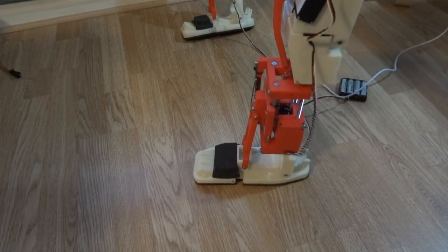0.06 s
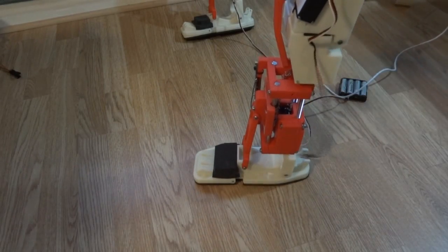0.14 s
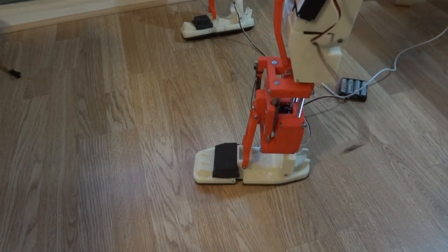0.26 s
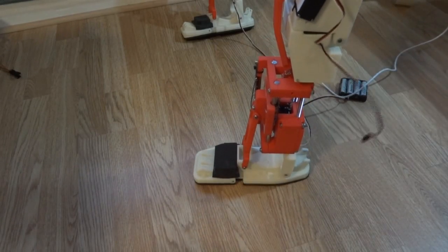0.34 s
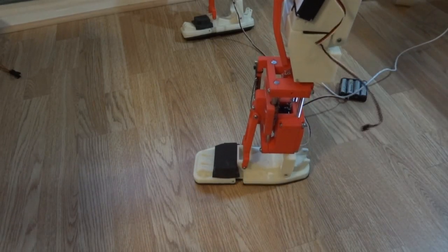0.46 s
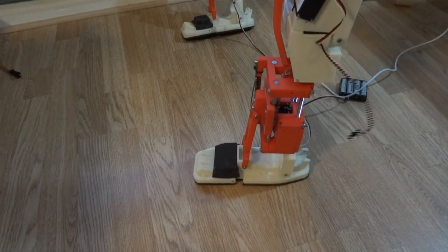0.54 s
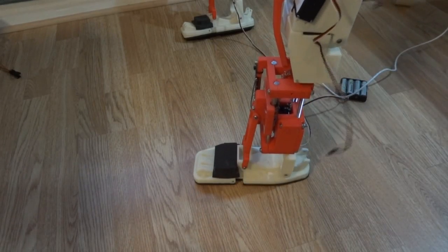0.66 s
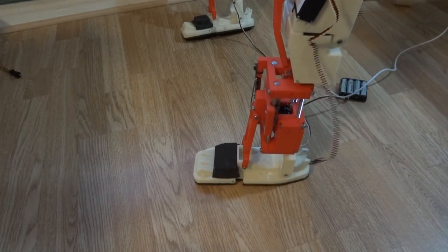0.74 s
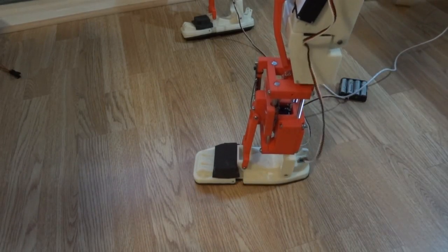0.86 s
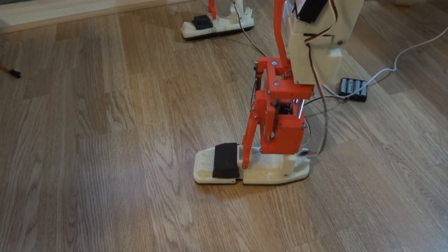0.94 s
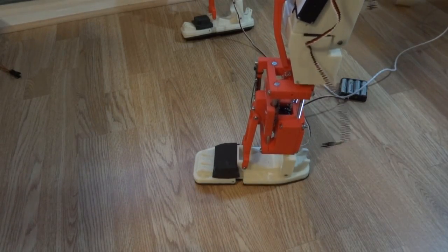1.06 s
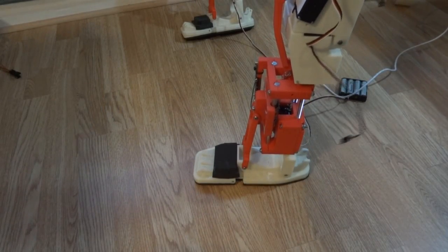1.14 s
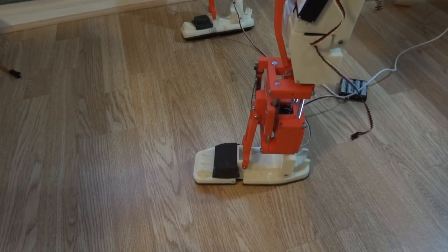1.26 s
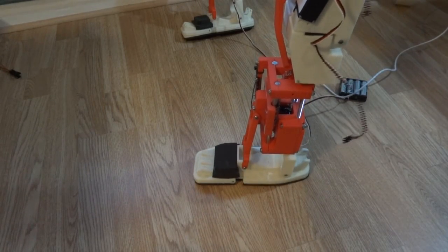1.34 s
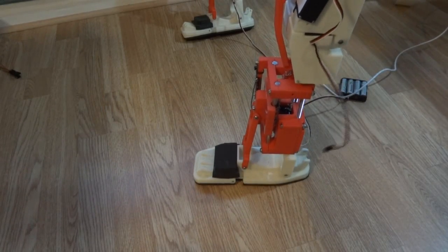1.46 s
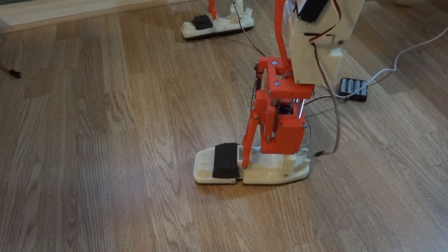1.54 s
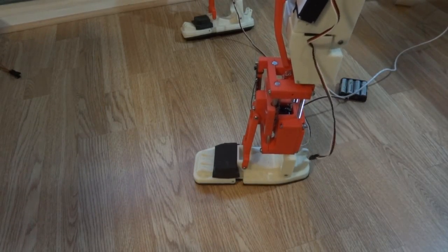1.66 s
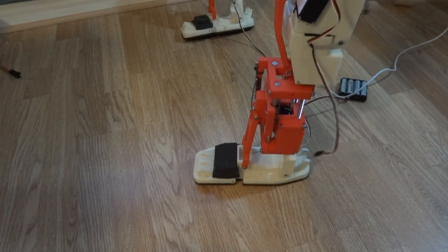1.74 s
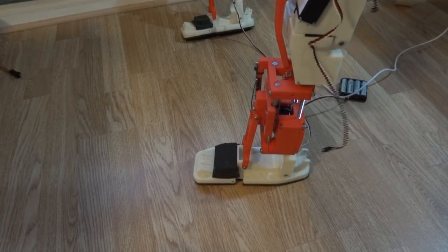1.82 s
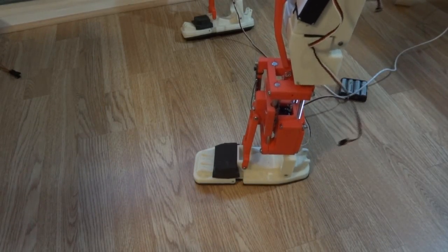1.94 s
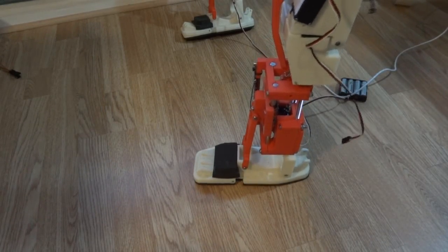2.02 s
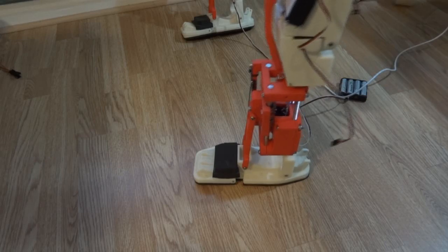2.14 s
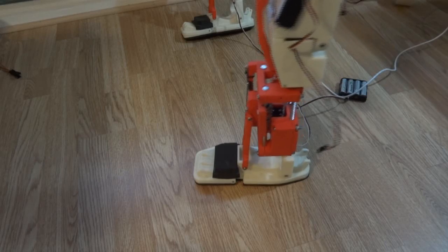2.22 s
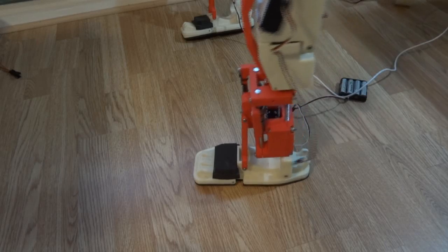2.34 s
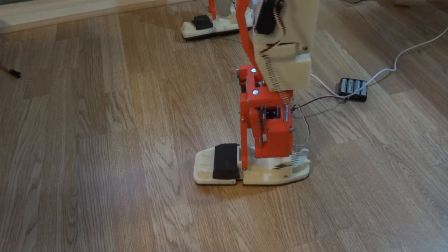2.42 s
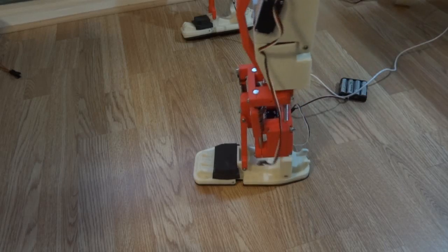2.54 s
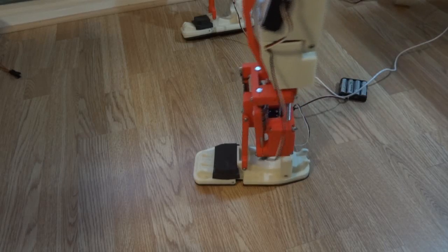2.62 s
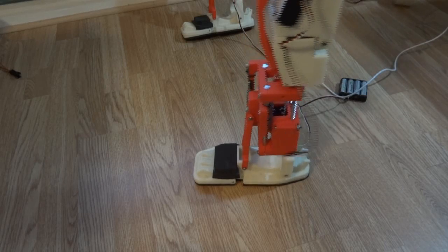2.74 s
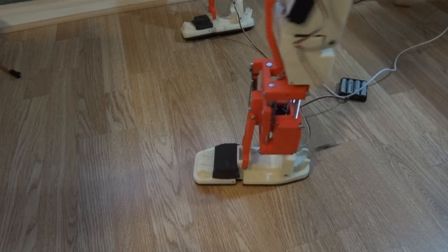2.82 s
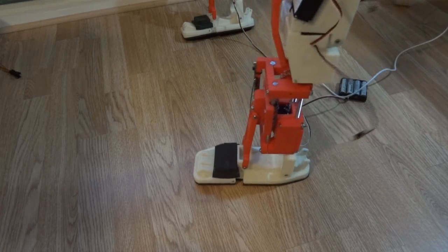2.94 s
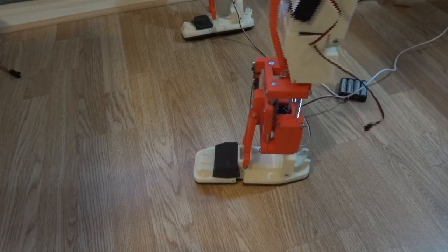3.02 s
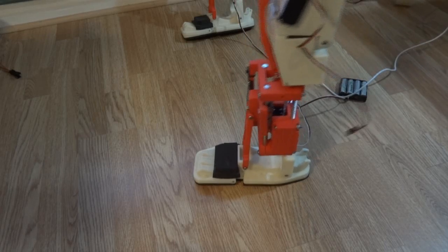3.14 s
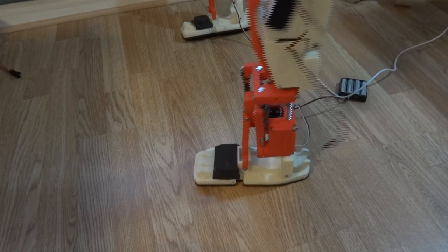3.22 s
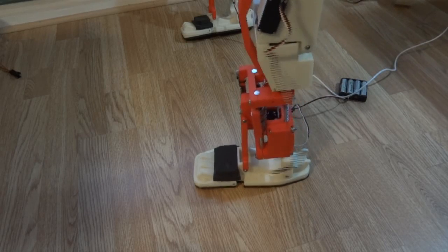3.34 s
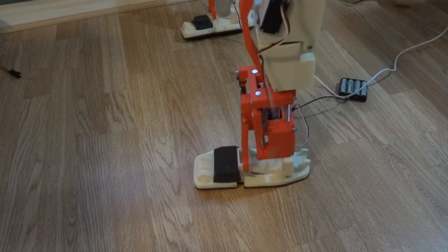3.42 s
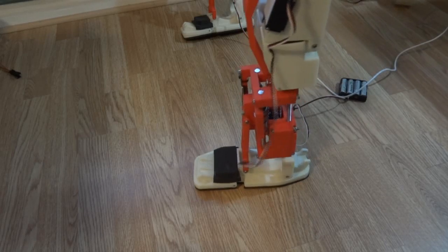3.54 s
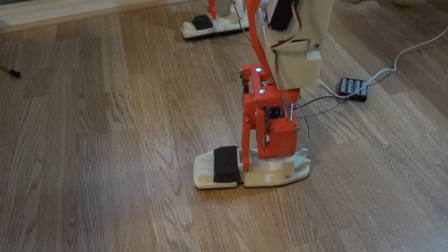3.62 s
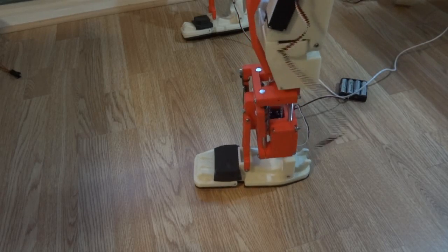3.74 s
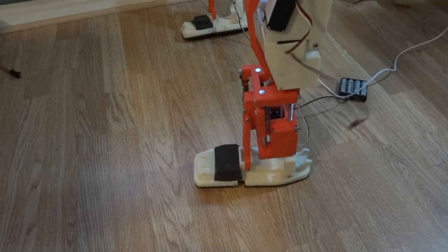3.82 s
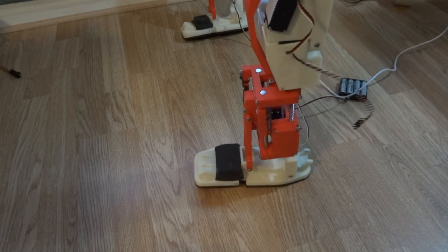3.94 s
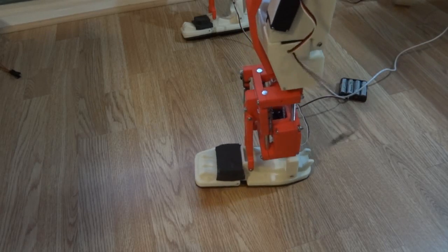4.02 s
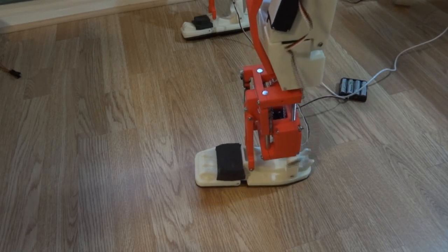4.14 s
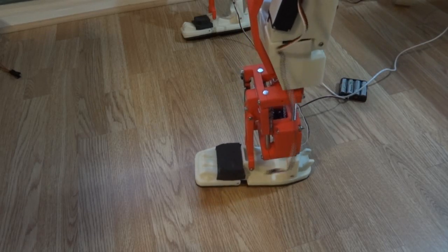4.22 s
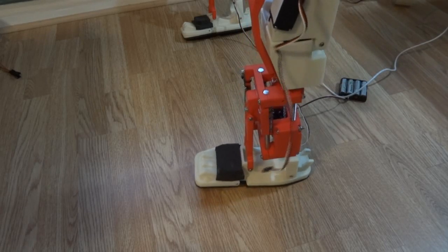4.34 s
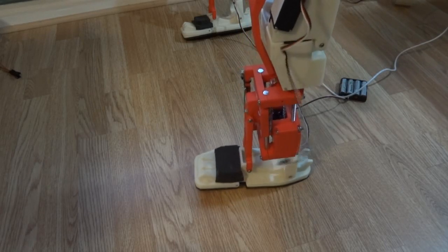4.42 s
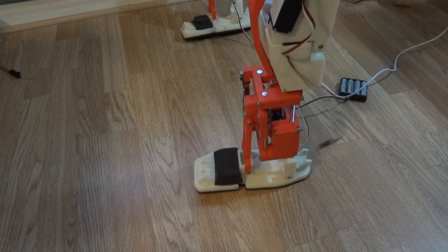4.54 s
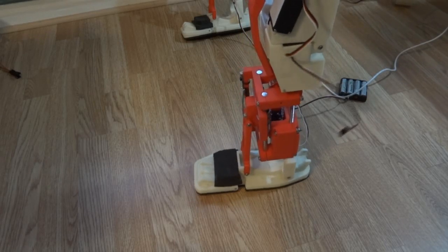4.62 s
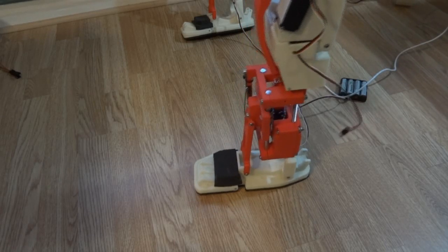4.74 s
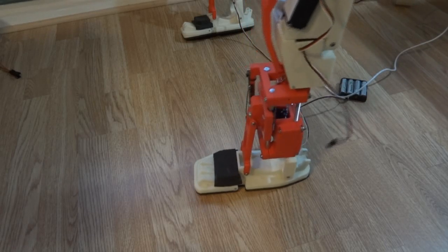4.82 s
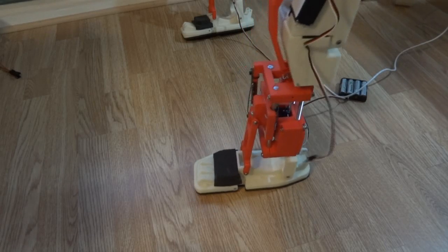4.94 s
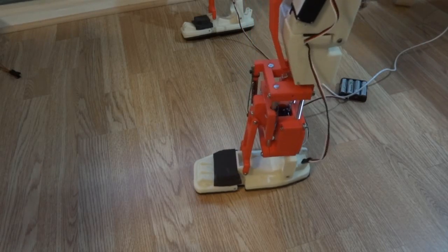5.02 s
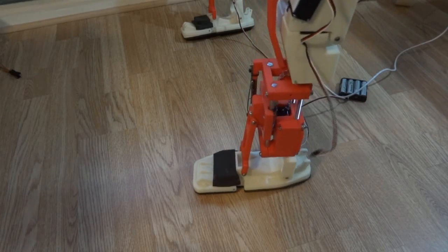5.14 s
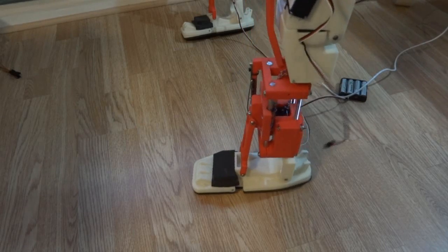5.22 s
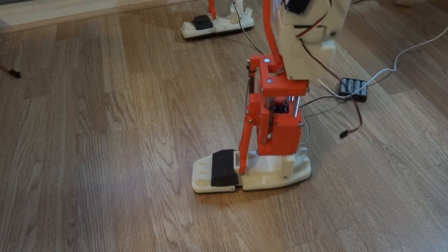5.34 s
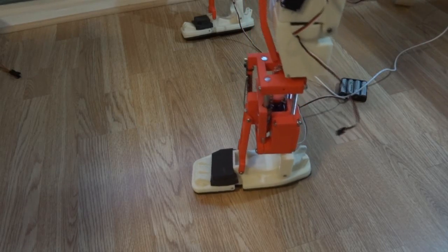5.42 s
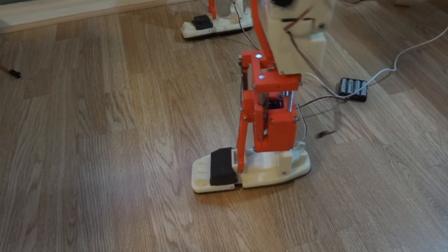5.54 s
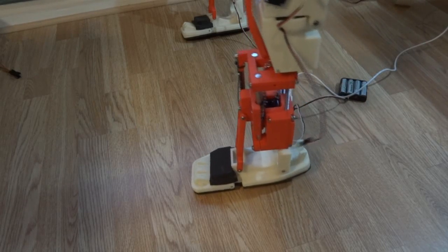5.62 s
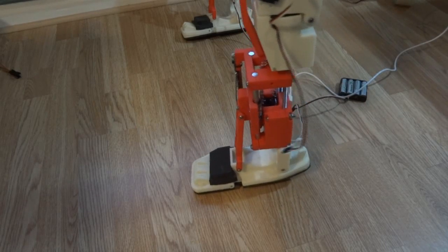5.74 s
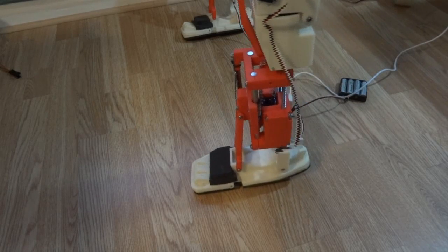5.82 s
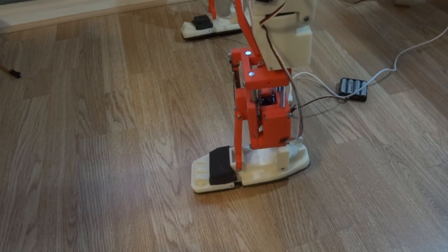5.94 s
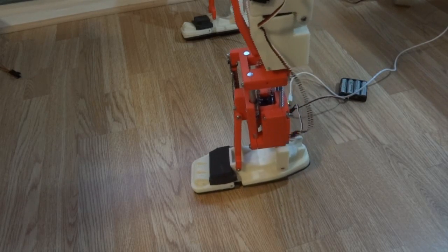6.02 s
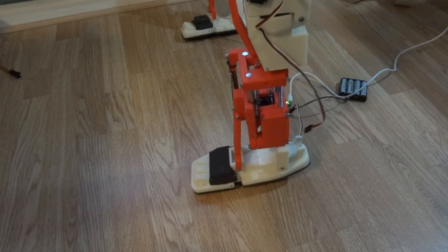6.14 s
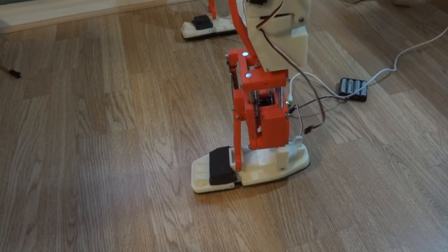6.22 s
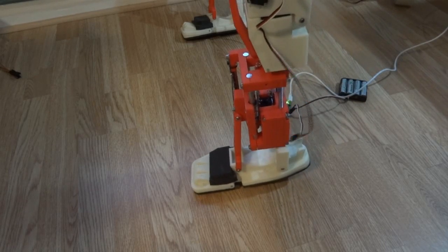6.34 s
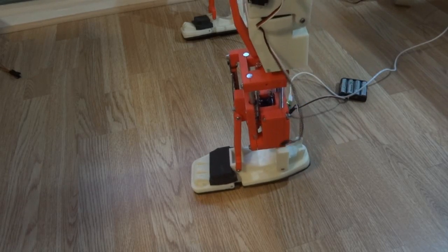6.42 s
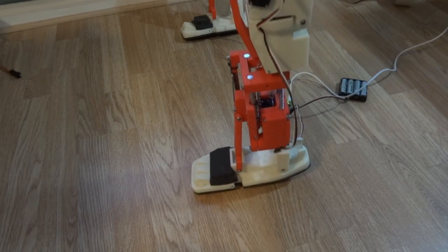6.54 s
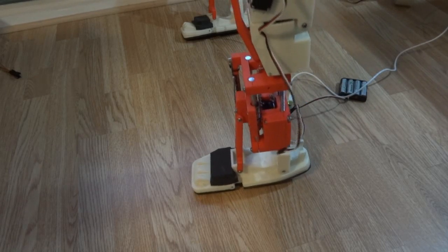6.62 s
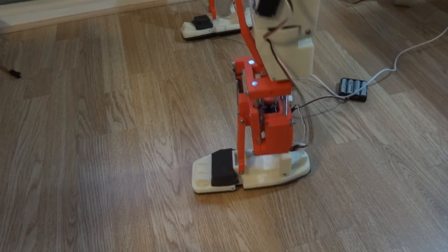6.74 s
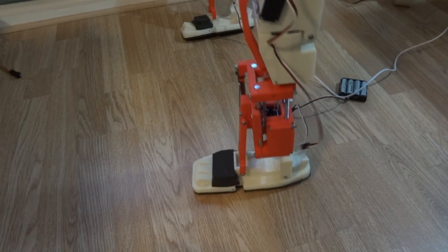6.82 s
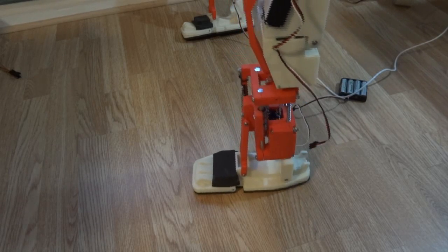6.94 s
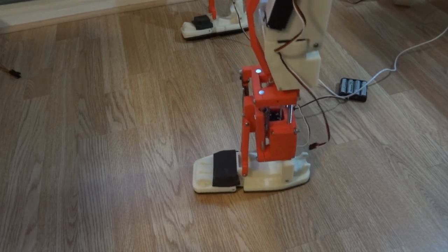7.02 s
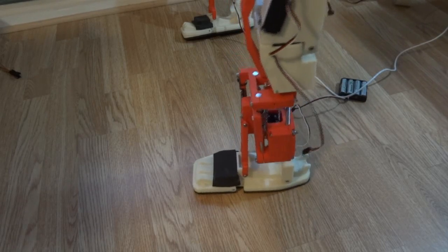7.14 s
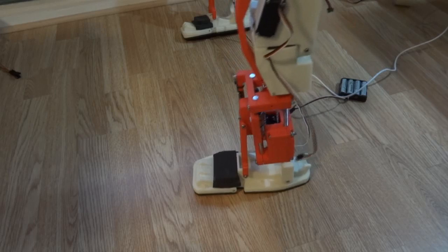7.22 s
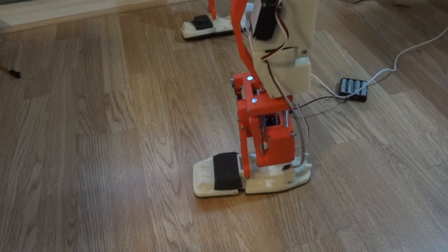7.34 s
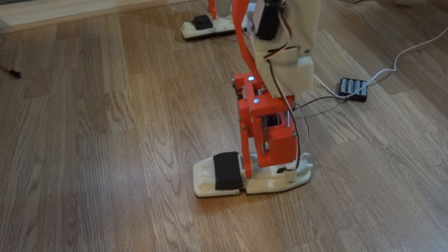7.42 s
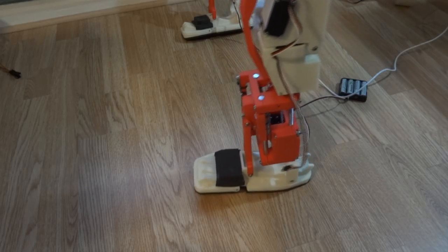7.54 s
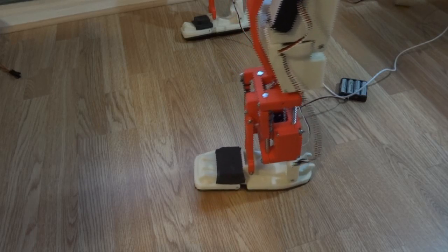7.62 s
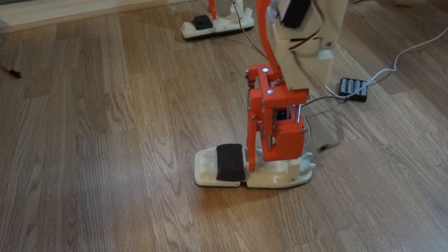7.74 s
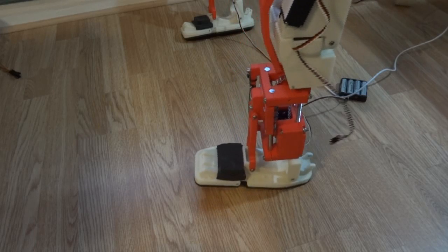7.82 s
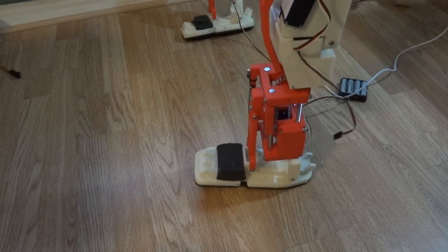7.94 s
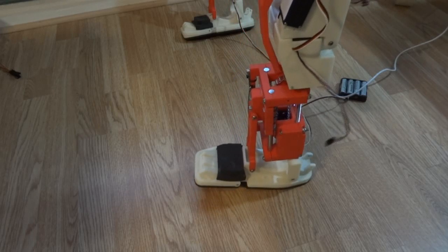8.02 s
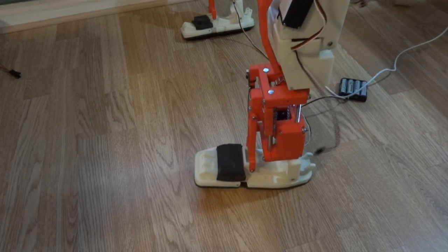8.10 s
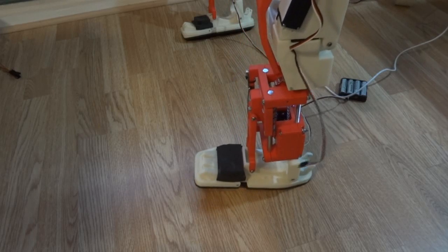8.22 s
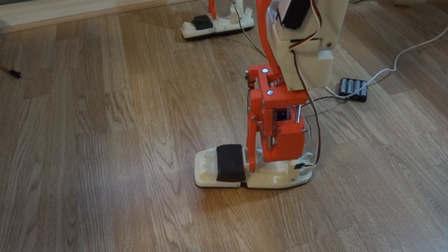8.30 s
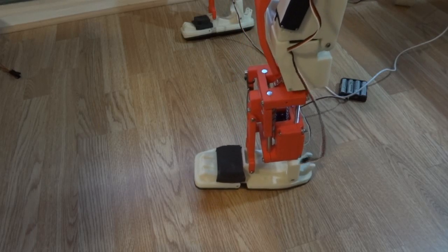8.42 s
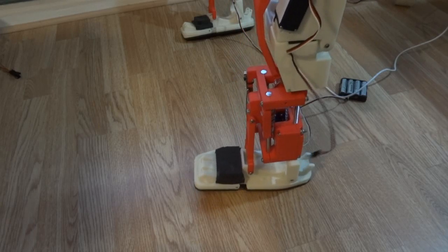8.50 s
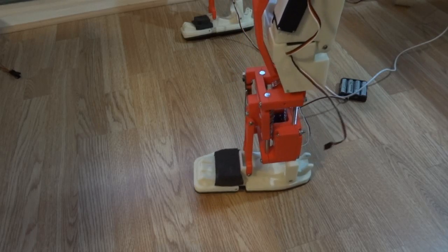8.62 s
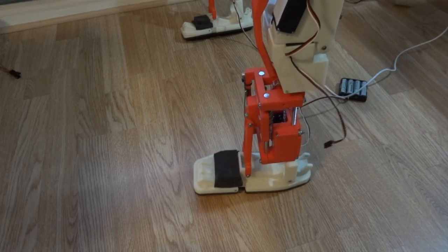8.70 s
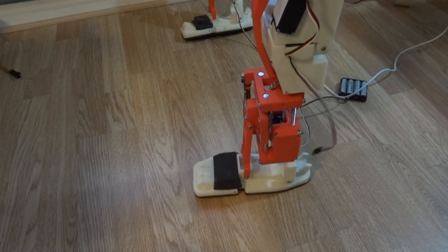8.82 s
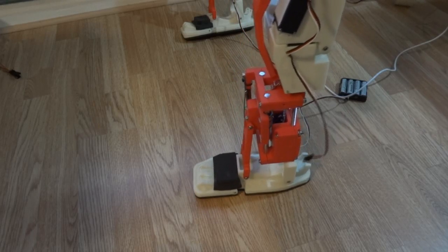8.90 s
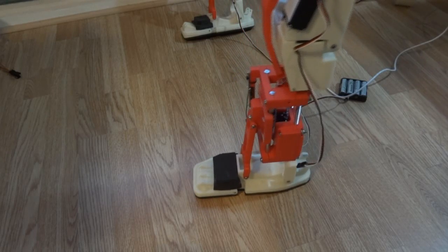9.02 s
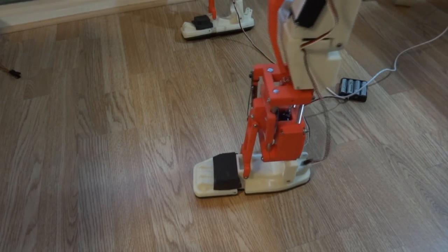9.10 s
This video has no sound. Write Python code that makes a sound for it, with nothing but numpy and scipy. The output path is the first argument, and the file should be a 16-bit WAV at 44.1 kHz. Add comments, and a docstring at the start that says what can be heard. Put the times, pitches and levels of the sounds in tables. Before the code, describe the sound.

Small servo motors buzz faintly as they hold a robot's plastic leg still on a wooden floor, heard close in a small room. A few soft scuffs and dull bumps come in the first second, and a light click at 1.6 seconds. At 2 seconds a gear clacks and the motors begin a much louder, high whine with a bright rasp. Five runs follow back to back, starting near 2, 2.5, 3, 3.4 and 4.3 seconds, each rising and falling in pitch. The last begins with a clack and a quieter whir, grows loud, then winds down by 5.5 seconds. The buzz returns, with a few sharp ticks around 5.8 to 6 seconds. From 6.5 seconds another run starts strained, turns raspier and slows by 7.7. More buzzing follows, then a clack at 8.4 and a final whine, loudest from 8.9 to 9.2 seconds.

```python
"""A low buzz with a few soft scuffs and bumps, then bursts of whining and rasping: small servo motors
bend a walking robot's plastic leg on a wooden floor in a small room.
The gear whine rises and falls with the motor's speed, and pressed teeth add a bright rasp.
Between moves, about 50 control pulses a second kick the motors and make them buzz."""
import sys
import numpy as np
from scipy import signal
from scipy.fft import rfft, irfft
from scipy.io import wavfile
from scipy.ndimage import uniform_filter1d

SR = 44100
rng = np.random.default_rng(int(sys.argv[2]) if len(sys.argv) > 2 else 0)


def int16_out(signal):
    """Quantize to a 16-bit WAV file."""
    q = np.round(np.clip(np.atleast_2d(signal).T, -1, 1) * 32767)
    wavfile.write(sys.argv[1], SR, q.astype(np.int16))


N = 404397
TIME = np.arange(N) / SR

# Levels in the tables are relative: the functions turn each layer up or down.
# Tone colours, or how strong each pitch is in a sound: pitch_hz, level_db
ROOM_COLOUR = [(25, -28), (55, 0.5), (80, -6), (133, -1), (250, -2), (666, -9), (1050, -4.5), (1600, -6.5),
               (2400, -12), (3200, -16), (6220, -21), (13200, -27), (14000, -23), (15500, -30)]
SCUFF_COLOUR = [(41, -39), (70, -18), (154, 2), (322, -4), (647, -12), (740, -4), (1010, -9), (1700, -9.5),
                (2220, -18), (3480, -14.5), (4260, -17), (15000, -29)]
BUMP_COLOUR = [(90, -8), (150, 1), (300, -3), (450, -7.5), (750, -4.5), (1000, -8.5), (1800, -20),
               (4000, -22), (12000, -28.5)]  # hollow and dull
CLACK_COLOUR = [(710, -71), (1200, -25), (1610, -2), (2060, -4), (4270, 6), (8390, -8.5), (9930, -19),
                (15000, -8)]
TICK_COLOUR = [(1470, -31), (2500, -12), (4320, -5.5), (7640, -1), (9150, -17), (10400, -10), (13400, -21),
               (15000, -21)]
UPRIGHT_BUZZ_COLOUR = [(800, -22), (969, -12), (1050, -15), (1140, -5), (1230, -14), (1350, -7), (1430, -9),
                       (1520, -2), (1660, 2), (1760, -2), (1860, -11), (2480, -15), (2840, -24),
                       (3500, -32)]
BENT_BUZZ_COLOUR = [(470, -47), (800, -47), (911, -13), (1020, 1), (1140, -23), (1260, 3), (1470, 0.5),
                    (1560, 7), (1910, -5), (2000, -34), (2270, -10.5), (3020, -24), (3500, -41),
                    (4550, -65), (7700, -120)]
SHAKE_COLOUR = [(21, -28), (35, -10), (59, -1.5), (81, -13.5), (116, 1), (140, 6), (189, -7.5), (231, 0.5),
                (343, -12), (367, -18), (404, -28), (583, -37), (807, -26), (900, -29), (1170, -40),
                (1980, -120)]
BRUSH_COLOUR = [(400, -12), (535, -13), (809, -20), (943, -12), (1190, -14), (1500, -1.5), (2500, -7),
                (3310, -7), (5080, -12.5), (7000, -13), (10600, -17), (13900, -9), (15500, -6)]  # hiss of the motor's sliding contacts
RASP_COLOUR = [(530, -49), (900, -36.5), (1040, -10), (1230, -21.5), (1500, -19), (1670, -20),
               (1980, -13.5), (2360, -9.5), (2960, -0.5), (3340, -0.5), (4890, 3.5), (7780, -1.5),
               (9080, 0.5), (12100, -11), (15500, -17.5)]
OVERTONE_COLOUR = [(3000, 3), (4500, 3.5), (6000, -2), (7600, -3), (9200, -6), (10800, -9), (12500, -16),
                   (15500, -38)]  # the gear whine's upper tones
# How much left and right differ: pitch_hz, side_level_db
STEREO_WIDTH = [(60, -21), (170, -14), (230, -8.5), (330, -5.5), (600, -2), (850, -3), (1100, -13),
                (1600, -17.5), (3000, -15), (5000, -18.5), (8000, -13), (11000, -32.5), (14000, -48)]
# Pitches at which parts ring: pitch_hz, width_hz (ringing() narrows it), level_db
FLOOR_RINGS = [(57.2, 24, -1)]
FRAME_RINGS = [(226.7, 53, 3), (1002, 390, 2.5)]
CASE_RINGS = [(1646, 42, -8.5), (2234, 73, -7), (2531, 205, -1.5), (2960, 110, -5.5)]

# The leg shifts its weight on the floor: start_s, length_s, level_db
WEIGHT_SHIFTS = [(2.22, 0.16, -46.5), (7.08, 0.1504, -61)]
# Soft scuffs: start_s, length_s, rise_s, level_db
SCUFFS = [(0.231, 0.43, 0.25, -44), (0.736, 0.13, 0.013, -50.5)]
# Short knocks: start_s, level_db
BUMPS = [(0.137, -32), (0.545, -36), (0.592, -31), (0.626, -33), (0.741, -29), (0.764, -29)]
CLACKS = [(0.2558, -45), (1.9824, -30), (4.295, -30.5), (4.3144, -43), (8.4208, -36.5), (8.4413, -30.5)]  # loose gears snap into contact
TICKS = [(0.136, -27.5), (1.5883, -20.5), (1.6144, -43)]  # light plastic clicks

# The leg holds still, upright or bent, and buzzes: start_s, end_s, level_db
UPRIGHT_HOLDS = [(0.0, 1.92, -56)]
BENT_HOLDS = [(4.12, 4.3, -54.5), (5.3, 5.91, -54), (5.96, 6.54, -53), (7.6, 8.45, -56)]
# Pulses are even at rest and uneven while the leg sways: time_s, spread_db
PULSE_UNEVENNESS = [(1.45, .6), (1.55, 2), (5.95, 2), (6.1, .7), (6.55, .7), (7.6, 2.5)]
# Harder kicks of a holding servo, each moved to the nearest pulse: time_s, level_db
HARD_KICKS = [(5.6466, -44), (5.7658, -27), (5.8461, -46), (5.8656, -30), (6.0247, -28), (6.0447, -43),
              (8.2222, -33)]

# Motor speed in each move, as gear teeth meeting per second: time_s, tooth_hz
MOVE_1 = [(1.97, 520), (2.03, 928), (2.086, 1321), (2.118, 1343), (2.148, 1277), (2.24, 1454),
          (2.318, 1330), (2.39, 952), (2.52, 228)]
MOVE_2 = [(2.551, 480), (2.627, 1278), (2.679, 1437), (2.815, 1549), (2.878, 1555), (2.915, 1525),
          (2.953, 520)]
MOVE_3 = [(2.96, 702), (3.025, 1402), (3.059, 1494), (3.12, 1502), (3.199, 1492), (3.329, 1478),
          (3.375, 1313), (3.429, 331)]
MOVE_4 = [(3.44, 600), (3.551, 1264), (3.646, 1050), (3.659, 700), (3.72, 1328), (3.77, 1440),
          (3.947, 1405), (4.0, 1365), (4.04, 1240), (4.09, 803), (4.171, 198.7)]
MOVE_5 = [(4.29, 898), (4.34, 1638), (4.45, 1816), (4.675, 1820), (4.733, 1717), (4.816, 1529),
          (4.922, 1297), (4.978, 1300), (5.11, 996.4), (5.25, 994), (5.43, 577.3), (5.56, 237.3)]
MOVE_6 = [(6.52, 856), (6.628, 1183), (6.74, 1257), (6.86, 1742), (7.018, 1868), (7.12, 1814),
          (7.174, 1641), (7.27, 1518), (7.49, 1338), (7.57, 864), (7.68, 238.5)]
MOVE_7 = [(8.42, 855), (8.53, 1350), (8.6, 1463), (8.794, 1594), (8.94, 1615), (8.975, 1485), (9.18, 1293)]
MOVES = [MOVE_1, MOVE_2, MOVE_3, MOVE_4, MOVE_5, MOVE_6, MOVE_7]
# Faint tones of the rotor, the motor's spinning core: cycles_per_turn, level_db
ROTOR_TONES = [(4, -25), (6, -25), (9, -17), (11, -16), (13, -19), (14, -16), (15, -11), (17, -18),
               (21, -20), (66, -15), (79, -19)]
# The motor labours and its case rings harder: start_s, length_s, level_db
STRAINS = [(3.53, 0.071, -43.5), (6.52, 0.29, -45.5), (8.65, 0.29, -55)]
# Teeth under load, at cruising speed: start_s, length_s, hum_db, whine_db, overtone_db, rasp_db, shake_db
GEAR_LOADS = [(1.957, 0.59, -50, -30, -27.5, -24.5, -59), (2.534, 0.44, -42, -26, -26, -22.5, -50.5),
              (2.967, 0.43, -45.5, -29, -23, -25, -58.5), (3.646, 0.61, -45.5, -29.5, -28.5, -22.5, -60),
              (4.679, 0.269, -40.5, -26, -25.5, -21.5, -50), (4.924, 0.54, -44.5, -34.5, -30, -21, -54.5),
              (6.506, 0.29, -42, -42, -41, -39.5, -62), (6.725, 0.21, -43, -44, -51, -43.5, -58),
              (7.095, 0.524, -44.5, -30, -28, -22.5, -54), (8.924, 0.3, -43.5, -26.5, -29, -22.5, -51)]
# Gears with no load, at cruising speed: hum_db, whine_db, overtone_db, rasp_db, shake_db
SLACK_LEVELS = [-54.5, -60.5, -67.5, -51, -59]

CONTROL_HZ, FIRST_PULSE_S = 50.08, 0.0146
CRUISE_HZ, TEETH_PER_TURN = 1500, 10  # usual tooth rate; teeth on the motor's own gear
BITE_S, SETTLE_S, LET_GO_DB_PER_S = 0.039, 0.095, 450  # under load the rasp comes before the tones


def from_db(db):
    """Turn decibels into a number to multiply a sound by."""
    return 10 ** (np.asarray(db) / 20)


def unit_level(x):
    """Scale a signal to an average power of 1."""
    return x / np.sqrt(np.mean(np.abs(x) ** 2) + 1e-20)


def at_time(points, t=TIME):
    """Read a curve at the times t."""
    return np.interp(t, *np.transpose(points))


def at_pitch(points, hz):
    """Read a tone colour at the pitches hz, with octaves evenly spaced."""
    pitch_hz, level_db = np.transpose(points)
    return np.interp(np.log(np.maximum(hz, 1)), np.log(pitch_hz), level_db)


def during(start, end):
    """1 from start to end and 0 outside, with 10 ms fades."""
    return np.clip(np.minimum(TIME - start, end - TIME) / .01 + .5, 0, 1)


def swell(start, length, rise_s, fade_db_per_s, t=TIME):
    """A level that rises, holds and fades."""
    rise = np.clip((t - start) / rise_s, 0, 1)
    return rise * from_db(-fade_db_per_s * np.clip(t - start - length, 0, 1))


def pressing(rows):
    """A push that builds up, holds and lets go, once for each row."""
    return sum(from_db(db) * swell(start, length, BITE_S, LET_GO_DB_PER_S) for start, length, db in rows)


def drift(rate_hz, count=N):
    """A smooth random wobble of typical size 1."""
    keep = np.exp(-2 * np.pi * rate_hz / SR)
    warm_up = SR // 10
    wobble = signal.lfilter([1], [1, -2 * keep, keep * keep], rng.standard_normal(count + warm_up))
    return unit_level(wobble[warm_up:])


def colour(x, spectrum):
    """Give a sound a tone colour, dropping steeply outside the table's pitches."""
    size = 8192
    hz = np.maximum(np.fft.rfftfreq(size, 1 / SR), 1)
    octaves_outside = np.abs(np.log2(hz / np.clip(hz, spectrum[0][0], spectrum[-1][0])))
    gain = from_db(at_pitch(spectrum, hz) - 20 * np.minimum(octaves_outside, 2))
    # build a filter that rings only after a hit, never before (minimum phase)
    cepstrum = irfft(np.log(gain))
    one_sided = 2 * cepstrum[:size // 2] * (np.arange(size // 2) > 0)
    response = irfft(np.exp(rfft(one_sided, size)))
    return signal.oaconvolve(x, response / np.linalg.norm(response))[:N]


def noise(spectrum):
    """Steady noise with a tone colour."""
    return colour(rng.standard_normal(N), spectrum)


def ringing(rings):
    """Tiny random pushes keep a part ringing at its own pitches."""
    sound = 0
    for hz, width, db in rings:
        peak = signal.iirpeak(hz, hz / width / 0.54, fs=SR)
        filtered = signal.lfilter(*peak, rng.standard_normal(N))
        sound += from_db(db) * unit_level(signal.lfilter(*peak, filtered))
    return sound


def strikes(events, spectrum, fade_s, crack=4.4):
    """Each knock is a sharp hit and a rattle that falls 60 dB in fade_s."""
    force = np.zeros(N)
    for start, level_db in events:
        at = int(start * SR)
        age = TIME[at:at + SR // 2] - start
        force[at:at + len(age)] += from_db(level_db - 60 * age / fade_s) * rng.standard_normal(len(age))
        force[at] += crack * from_db(level_db)
    return colour(force, spectrum)


def room_tone(level_db):
    """The faint, steady rumble and hiss of the room."""
    return from_db(level_db) * noise(ROOM_COLOUR)


def echo_tail(fade_s):
    """A crowd of echoes that falls 60 dB in fade_s."""
    t = TIME[:SR // 2]
    tail = rng.standard_normal(len(t)) * from_db(-60 * t / fade_s) * (t > .003)
    return tail / np.linalg.norm(tail)


def room_echoes(x, fade_s):
    """The sound that floor and walls send back."""
    return signal.oaconvolve(x, echo_tail(fade_s))[:N]


def stereo(x, fade_s):
    """Left and right differ only by echoes arriving from the sides."""
    width = from_db(at_pitch(STEREO_WIDTH, np.fft.rfftfreq(SR, 1 / SR)))
    side_tail = irfft(rfft(echo_tail(fade_s), SR) * width)[:SR // 2]
    side = signal.oaconvolve(x, side_tail)[:N]
    return np.array([x + side, x - side])


def floor_boom():
    """The boards boom faintly as the leg shifts its weight."""
    return pressing(WEIGHT_SHIFTS) * ringing(FLOOR_RINGS)


def frame_drone(start_s, end_s, level_db):
    """Trembling servos keep the strained frame ringing."""
    return during(start_s, end_s) * from_db(level_db) * ringing(FRAME_RINGS)


def scuffs_and_knocks():
    """Rubbing makes soft swells of noise; brief hits make bumps, clacks and ticks."""
    rubbing = sum(from_db(db) * swell(start, length, rise_s, fade_db_per_s=160)
                  for start, length, rise_s, db in SCUFFS)
    scuffs = rubbing * from_db(-4.5 + 1.5 * drift(46)) * noise(SCUFF_COLOUR)
    bumps = from_db(-8.5) * strikes(BUMPS, BUMP_COLOUR, fade_s=0.08)
    clacks = from_db(-6) * strikes(CLACKS, CLACK_COLOUR, fade_s=0.085, crack=2.8)
    ticks = from_db(-25.5) * strikes(TICKS, TICK_COLOUR, fade_s=0.27)
    return scuffs + bumps + clacks + ticks


def holding_buzz(holds, spectrum, others, gap_s, rattle, rattle_s):
    """Each pulse kicks one stalled motor, then two others more weakly; their gears rattle briefly."""
    spread_db = at_time(PULSE_UNEVENNESS)
    pulses_s = np.arange(FIRST_PULSE_S, TIME[-1] - 1 / CONTROL_HZ, 1 / CONTROL_HZ)
    kicks = np.zeros(N)
    for servo, strength in enumerate([1, others, others]):
        at = (pulses_s * SR).astype(int) + int(servo * gap_s * SR)
        kicks[at] += strength * from_db(spread_db[at] * rng.standard_normal(len(at)))
    kick_tails = signal.lfilter([1], [1, -np.exp(-1 / (rattle_s * SR))], kicks)
    chatter = rattle * kick_tails * rng.standard_normal(N)
    level = sum(during(start, end) * from_db(db) for start, end, db in holds)
    return level * unit_level(colour(kicks + chatter, spectrum))


def servo_buzz():
    """Servos buzz as they hold the leg still, with a few harder kicks."""
    upright = holding_buzz(UPRIGHT_HOLDS, UPRIGHT_BUZZ_COLOUR,
                           others=.35, gap_s=.00318, rattle=.01, rattle_s=.006)
    bent = holding_buzz(BENT_HOLDS, BENT_BUZZ_COLOUR, others=.25, gap_s=.0013, rattle=.028, rattle_s=.009)
    kicks = np.zeros(N)
    for time_s, level_db in HARD_KICKS:
        pulse = round((time_s - FIRST_PULSE_S) * CONTROL_HZ)
        kicks[int((FIRST_PULSE_S + pulse / CONTROL_HZ) * SR)] = from_db(level_db + 3.5)
    return upright + from_db(1) * bent + colour(kicks, BENT_BUZZ_COLOUR)


def motor_hiss(running):
    """The motor's brushes hiss and its case rings, harder when it labours."""
    brushes = running * from_db(1.5) * noise(BRUSH_COLOUR)
    case = (running * from_db(-5) + pressing(STRAINS)) * ringing(CASE_RINGS)
    return brushes + case


def rotor_tones(rotor_angle):
    """Contacts and bearings repeat their sound every turn, making wavering tones."""
    tones = 0
    for cycles, db in ROTOR_TONES:
        waver = 1 + 0.6 * drift(29, len(rotor_angle))
        tones += from_db(db) * waver * np.sin(cycles * rotor_angle + rng.uniform(0, 2 * np.pi))
    return tones


def gear_levels(t, tooth_hz):
    """Hum, whine, overtones, rasp and shake in dB: faint when slack, louder with load and speed."""
    rises_s = np.array([BITE_S, SETTLE_S, SETTLE_S, BITE_S, SETTLE_S])[:, None]
    power = from_db(SLACK_LEVELS)[:, None] ** 2
    for start, length, *levels_db in GEAR_LOADS:
        load = swell(start, length, rises_s, LET_GO_DB_PER_S, t)
        power = power + (from_db(levels_db)[:, None] * load) ** 2
    hum, whine, overtone, rasp, shake = 10 * np.log10(power)
    octaves = np.log2(tooth_hz / CRUISE_HZ)  # one octave is a doubling of speed
    capped_octaves = np.minimum(octaves, 0)  # stops growing at cruising speed
    # quick speed changes make the teeth chatter: less tone, a little more rasp
    octaves_per_s = np.abs(np.gradient(octaves)) * SR
    chatter_db = uniform_filter1d(np.minimum(0.7 * octaves_per_s, 6), size=800)
    return (hum + 27.5 * octaves - chatter_db,
            whine + 19 * capped_octaves - chatter_db,
            overtone + 14 * capped_octaves - chatter_db,
            rasp + 11 * capped_octaves + 0.22 * chatter_db,
            shake + 9.5 * octaves)


def tooth_rasp(tooth_angle, tooth_hz, rasp_db):
    """Pressed teeth scrape alike, so noise gathers near the gear tones; slow or slack ones just hiss."""
    count = len(tooth_angle)
    pitched = sum(drift(55.4 * (k + 1), count) * np.sin(k * tooth_angle) for k in range(1, 14))
    looseness = np.maximum((1350 - tooth_hz) / 700, (-32 - rasp_db) / 20)
    hiss_share = np.clip(.23 + looseness, .23, .9)
    hiss = np.sqrt(hiss_share) * rng.standard_normal(count)
    scrape = np.sqrt(1 - hiss_share) * unit_level(pitched) + hiss
    easing_db = np.interp(tooth_hz, [1350, 1500], [0, -2])  # fast teeth roll more and scrape less
    return from_db(rasp_db + easing_db - 5) * scrape


def gear_whine(tooth_angle, tooth_hz, hum_db, whine_db, overtone_db):
    """Meeting teeth hum, whine an octave higher and add overtones; slow gears slip and grind."""
    count = len(tooth_angle)
    slowness = np.clip((1450 - tooth_hz) / 350, 0, 1)
    slip = (0.011 + 0.31 * slowness) * drift(110, count)
    off_centre = 0.018 * np.sin(tooth_angle / TEETH_PER_TURN)  # the motor's gear wobbles once a turn
    angle = tooth_angle + slip + off_centre
    tones = from_db(hum_db + 0.5) * np.sin(angle)
    for k in range(2, 11):
        level_db = whine_db + 2 if k == 2 else overtone_db - 4.5 + at_pitch(OVERTONE_COLOUR, k * tooth_hz)
        roughness = 0.47 * drift(92, count)
        flutter = 0.22 * drift(17, count)
        grind = 1 + (.5 + slowness) * (roughness + flutter)
        tones += from_db(level_db) * grind * np.sin(k * angle)
    return np.sqrt(2) * tones


def servo_moves():
    """In each move the gears whine and rasp, the motor hisses and the frame shakes: (tones, noises)."""
    tones, rasp, running, shake = np.zeros((4, N))
    for move in MOVES:
        powered = during(move[0][0], move[-1][0])
        on = powered > 0
        t, fade = TIME[on], powered[on]
        tooth_hz = at_time(move, t)
        hum_db, whine_db, overtone_db, rasp_db, shake_db = gear_levels(t, tooth_hz)
        motor_db = -46 + 5.5 * np.log2(tooth_hz / CRUISE_HZ)
        wander = 1 + 0.001377 * drift(19.8, len(t))
        tooth_angle = 2 * np.pi * np.cumsum(tooth_hz * wander) / SR  # one cycle per tooth
        rotor_angle = tooth_angle / TEETH_PER_TURN
        pressure = fade * (1 + 0.2 * np.sin(tooth_angle / 66))  # the next gear binds every 66 teeth
        tones[on] += pressure * gear_whine(tooth_angle, tooth_hz, hum_db, whine_db, overtone_db)
        tones[on] += fade * from_db(motor_db + 0.5) * rotor_tones(rotor_angle)
        # the unbalanced rotor rocks the frame once a turn
        tones[on] += fade * from_db(shake_db - 7) * np.sin(rotor_angle)
        rasp[on] += pressure * tooth_rasp(tooth_angle, tooth_hz, rasp_db)
        running[on] += fade * from_db(motor_db)
        shake[on] += fade * from_db(shake_db)
    grain = from_db(0.5 * drift(130))
    scraping = colour(rasp * grain, RASP_COLOUR)
    return tones, scraping + motor_hiss(running) + shake * noise(SHAKE_COLOUR)


def scene():
    """The moving, buzzing leg and the room around it, in stereo."""
    tones, noises = servo_moves()
    buzz = servo_buzz()
    body = frame_drone(start_s=7.0, end_s=9.2, level_db=-60) + floor_boom() + scuffs_and_knocks()
    to_walls = from_db(-8) * tones + from_db(-4) * (noises + body) + from_db(-0.5) * buzz
    echoes = room_echoes(to_walls, fade_s=0.35)
    return stereo(tones + noises + buzz + body + echoes + room_tone(level_db=-55), fade_s=0.11)


def record(dry):
    """Cut away the highest treble, above 15600 Hz."""
    return signal.sosfilt(signal.ellip(12, .1, 80, 15600, fs=SR, output="sos"), dry)


dry = scene()
out = record(dry)
int16_out(out)
```